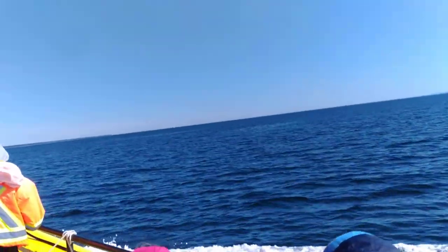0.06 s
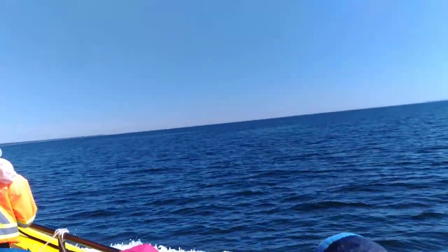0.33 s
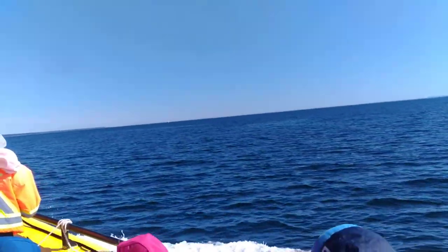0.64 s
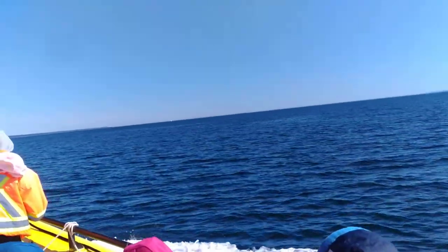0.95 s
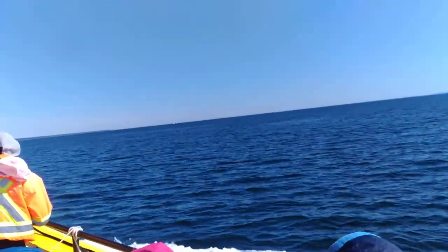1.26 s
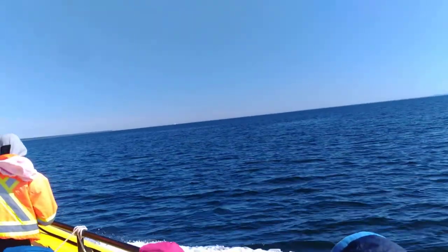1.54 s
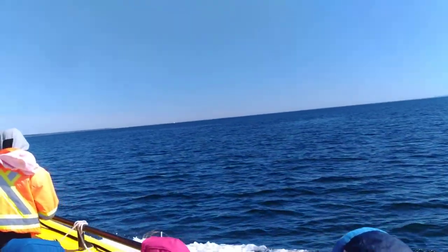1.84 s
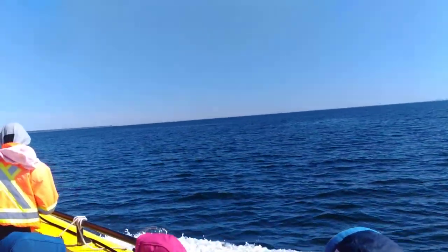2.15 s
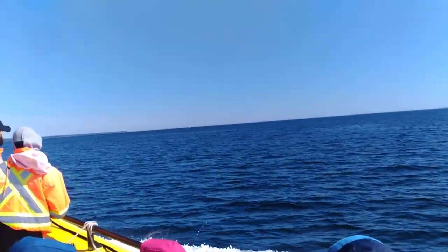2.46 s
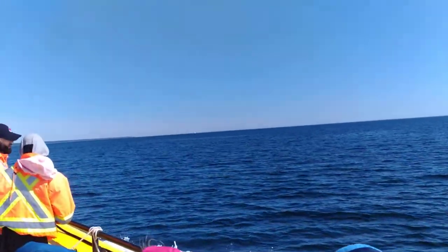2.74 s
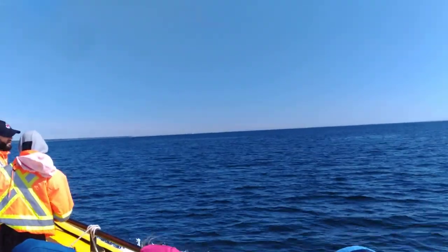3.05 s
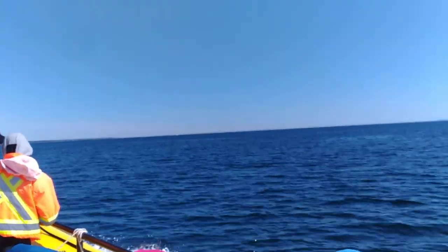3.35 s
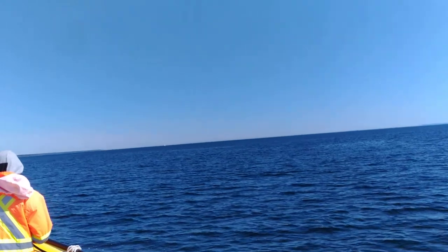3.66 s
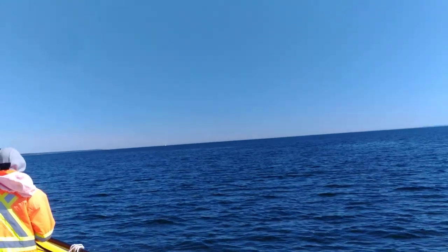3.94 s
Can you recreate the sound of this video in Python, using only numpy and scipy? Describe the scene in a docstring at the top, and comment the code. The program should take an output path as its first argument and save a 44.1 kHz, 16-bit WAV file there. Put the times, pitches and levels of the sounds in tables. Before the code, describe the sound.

Steady throbbing boat motor on open water, with gusts hitting the microphone and hissing spray.

```python
"""A motor boat's four-stroke engine drones at a steady cruising speed, heard from the deck.
Its orders beat into a throb over faint whines and clatter: loud at first, sinking back, swelling at the end.
Foam from the bow wash fizzes mostly on the left; spray and air hiss on the right.
Gusts throw eddies at the right microphone port, which flutters, rasps and thumps.
The ports colour the treble, and one sharp tick cuts in near the end."""
import sys
import numpy as np
from scipy import signal
from scipy.fft import rfft, irfft
from scipy.io import wavfile

SR = 44100
rng = np.random.default_rng(int(sys.argv[2]) if len(sys.argv) > 2 else 0)


def unload_audio(sound):
    """Save the sound as a 16-bit wav file, at the path given as the first command line argument."""
    columns = np.transpose(np.atleast_2d(sound))
    # keep every value between -1 and 1, then stretch to whole-number steps
    steps = np.round(np.clip(columns, -1, 1) * 32767)
    wavfile.write(sys.argv[1], SR, steps.astype(np.int16))


N = 176400
CYCLE_HZ = 14.83  # four-stroke cycles per second


def from_db(db):
    """Decibels to gain."""
    return 10 ** (np.asarray(db) / 20)


def rms_one(x):
    """Scale to an rms of one."""
    return x / np.sqrt(np.mean(x ** 2) + 1e-20)


def envelopes(rows):
    """Join breakpoints (seconds, then values) with straight lines: one envelope per value column."""
    seconds, *columns = np.transpose(rows)
    return np.array([np.interp(np.arange(N) / SR, seconds, column) for column in columns])


def db_at(curve, hz):
    """Read an EQ curve of (Hz, dB) points on a log-frequency axis."""
    points_hz, db = np.transpose(curve)
    return np.interp(np.log(np.maximum(hz, 1)), np.log(points_hz), db)


def equalise(x, curve):
    """Filter by an EQ curve, with no phase shift."""
    bins_hz = np.arange(N // 2 + 1) * SR / N
    return irfft(rfft(x) * from_db(db_at(curve, bins_hz)), N)


def noise(curve, texture=1):
    """White noise, modulated by a texture, then shaped by an EQ curve; rms one."""
    return rms_one(equalise(rng.standard_normal(N) * texture, curve))


def drift(rate_hz):
    """Smooth random motion at about this rate, with a spread of one."""
    hop, settle = 40, 2000  # samples per control step; steps for the filter to settle
    pole = np.exp(-2 * np.pi * hop * rate_hz / SR)
    white = rng.standard_normal(N // hop + settle + 2)
    slow = signal.lfilter([1], [1, -2 * pole, pole * pole], white)[settle:]
    return np.interp(np.arange(N) / hop, np.arange(len(slow)), rms_one(slow))


def waver(depth_db, rate_hz):
    """A randomly wavering gain of mean power one."""
    return rms_one(from_db(depth_db * np.clip(drift(rate_hz), -2, 2)))


def gust_strength():
    """Wind strength in dB: slow gusts plus buffets that rise fast and fall away more slowly."""
    # Gusts on the right port. Each row: time in seconds, strength in dB.
    gusts = [(0, -68), (0.2, -60), (0.24, -18), (0.36, -22), (0.6, -15.5), (0.98, -14), (1.32, -28.5),
             (1.38, -14.5), (1.92, -18.5), (2.02, -20.5), (2.2, -28), (2.26, -29), (2.61, -24),
             (2.8, -14.5), (3.13, -31), (3.33, -16), (3.4, -21.5), (3.99, -21.5)]
    # Single buffets slapping the port. Each row: start in seconds, peak strength in dB.
    buffets = [(0.219, -12.5), (0.473, -10), (0.716, -17), (0.89, -10.5), (1.002, -13.5), (1.124, -15),
               (1.357, -12), (1.588, -14.5), (1.816, -15), (2.017, -14.5), (2.095, -13.5), (2.167, -14.5),
               (2.514, -12), (2.653, -11), (2.973, -9), (3.038, -14), (3.284, -18.5), (3.454, -11.5),
               (3.639, -10.5)]
    rise_s = 0.0089
    power = from_db(envelopes(gusts)[0]) ** 2
    for start_s, peak_db in buffets:
        age = np.clip((np.arange(N) / SR - start_s) / rise_s, 0, 20)  # in rise times
        power = power + from_db(peak_db) ** 2 * age * np.exp(1 - age)
    return 10 * np.log10(power)


def eddies(per_second, decay_s):
    """Each eddy strikes at once and dies away; together they give an uneven pressure around one."""
    strikes = (rng.random(N) < per_second / SR) * rng.uniform(0, 1, N) ** 2
    pressure = signal.lfilter([1], [1, -np.exp(-1 / (decay_s * SR))], strikes + 1e-18)
    return pressure / pressure.mean() + .1


def wind():
    """Eddies hit the port in lumps over a low thumping; the small, rasping ones grow fastest in a gust."""
    # Tone of the large, fluttering eddies. Each row: frequency in Hz, gain in dB.
    flutter_eq = [(90, -35), (170, 2), (260, 0.5), (420, -5), (600, -10), (1000, -26), (4500, -66)]
    # Tone of the small, rasping eddies. Each row: frequency in Hz, gain in dB.
    rasp_eq = [(200, -19), (450, 3), (750, -3), (1100, -9), (1600, -18), (2300, -23), (5500, -67)]
    # Tone of the low thumping. Each row: frequency in Hz, gain in dB.
    thump_eq = [(15, -46), (45, -21), (90, 2), (140, -0.5), (200, -2), (300, -12), (600, -52)]
    # Envelope of the thumping. Each row: time in seconds, relative level in dB.
    thump_levels = [(0, -16), (0.18, -44), (0.23, -17.5), (1.3, -19), (1.36, -28), (2.14, -16), (2.33, -29),
                    (3.01, -17), (3.17, -33), (3.36, -15.5), (3.99, -18)]
    flutter_db, rasp_db, thump_db, left_db = 2.06, -10, -1.5, -21
    flutter_lumpiness, rasp_lumpiness, rasp_growth = 0.47, 0.84, 1.24
    gust_db = gust_strength()
    pressure = eddies(per_second=480, decay_s=0.0033)
    flutter = from_db(flutter_db + gust_db) * noise(flutter_eq, pressure ** flutter_lumpiness)
    steeper_gust_db = gust_db.mean() + rasp_growth * (gust_db - gust_db.mean())
    rasp = from_db(rasp_db + steeper_gust_db) * noise(rasp_eq, pressure ** rasp_lumpiness)
    thump = from_db(thump_db + envelopes(thump_levels)[0]) * noise(thump_eq)
    pan = np.array([[from_db(left_db)], [1]])
    return pan * (flutter + rasp + thump)


def spray():
    """Spray and air give a flickering hiss on the windward side, the right."""
    # Envelope of the hiss. Each row: time in seconds, relative level in dB.
    hiss_levels = [(0.0, -64), (0.16, -37), (0.51, -36.5), (0.87, -29), (1.04, -35), (1.41, -30.5),
                   (1.52, -37), (1.93, -32.5), (2.53, -32), (3.28, -29.5), (3.99, -34)]
    # Tone of the hiss. Each row: frequency in Hz, gain in dB.
    hiss_eq = [(1200, -12), (2200, 3.5), (4500, 1.5), (7000, 1), (9000, -1), (11000, 4), (16000, -7)]
    gain = from_db(envelopes(hiss_levels)[0] - 3)
    hiss = gain * noise(hiss_eq) * waver(depth_db=2.0, rate_hz=12.8)
    return np.array([np.zeros(N), hiss])


def bow_wash():
    """Bursting foam fizzes in surges, mostly along the left side, with one short splash."""
    # Surges of the wash. Each row: time in seconds, relative level in dB.
    surges = [(0.0, -30), (0.3, -30), (0.48, -32), (0.53, -44), (1.06, -48), (1.35, -37.5), (1.8, -44.5),
              (2.2, -48), (2.45, -35.5), (3.0, -45), (3.3, -37), (3.99, -42)]
    # Tone of the foam. Each row: frequency in Hz, gain in dB.
    foam_eq = [(1500, -17), (3000, 0.5), (4400, -2.5), (4850, -1), (5060, 3), (5300, -0.5), (6300, 2),
               (8000, -2.5), (16000, -36)]
    trim_db, right_db = -1.5, -10
    splash_s, splash_db, splash_width_s = 0.161, -23.5, 0.012
    splash = from_db(splash_db) * np.exp(-((np.arange(N) / SR - splash_s) / splash_width_s) ** 2)
    gain = from_db(trim_db) * np.hypot(from_db(envelopes(surges)[0]), splash)  # powers add
    foam = np.array([noise(foam_eq) * waver(depth_db=2.3, rate_hz=7.0) for side in range(2)])
    pan = np.array([[1], [from_db(right_db)]])
    return pan * gain * foam


def tick(start_s, level_db, decay_s):
    """A sharp tick: a sudden step that dies at once, stronger on the right."""
    age = np.arange(N) / SR - start_s
    step = -from_db(level_db) * (age >= 0) * np.exp(-np.abs(age) / decay_s)
    return step * np.array([[.8], [1]])


def whines(width_hz):
    """Faint engine whines, each a narrow band of noise around one pitch."""
    # The whines. Each row: pitch in Hz, relative level in dB.
    pitches = [(1198, -29.5), (1680, -34), (1921, -37.5)]
    sound = 0
    for hz, db in pitches:
        phase = 2 * np.pi * hz * np.arange(N) / SR
        band = drift(width_hz) * np.sin(phase) + drift(width_hz) * np.cos(phase)
        sound = sound + from_db(db) * band / 2
    return sound


def clatter(pulse_phase, depth):
    """Mechanical clatter and water along the hull: wide noise that pulses with the engine."""
    # Tone of the clatter. Each row: frequency in Hz, gain in dB.
    clatter_eq = [(30, -10), (200, 2.5), (550, 1.5), (800, -10), (2000, -17), (3000, -21), (6000, -33.5),
                  (10000, -24.5), (16000, -33)]
    pulsing = 1 + depth * np.sin(pulse_phase)
    return np.array([noise(clatter_eq), noise(clatter_eq)]) * pulsing


def drone(cycle_phase, firing_order):
    """Wavering engine orders, loosely in phase, beat into one throb per cycle; rms one."""
    # Strong low orders. Each row: multiple of the cycle rate, relative level in dB.
    low_orders = [(6, -7.5), (7, -25), (8, -11.5), (9, 1), (10, -20), (11, -7), (12, -0.5), (13, -17),
                  (14, -7.5), (15, -16), (16, -29), (17, -12), (18, -20.5), (19, -15)]
    # Weak upper orders as the hull passes them on. Each row: frequency in Hz, relative level in dB.
    hull_eq = [(295, -23), (345, -32.5), (440, -25.5), (590, -27.5), (650, -38.5), (900, -36)]
    swell_hz, swell_top_s, swell_db = 0.468, 0.022, 3.5  # the firing note swells slowly
    scatter_radians = 0.9
    upper_orders = [(order, db_at(hull_eq, order * CYCLE_HZ)) for order in range(20, 60)]
    swell = from_db(swell_db * np.cos(2 * np.pi * swell_hz * (np.arange(N) / SR - swell_top_s)))
    sound = 0
    for order, db in low_orders + upper_orders:
        gain = from_db(db) * waver(depth_db=1.5, rate_hz=0.82)
        if order == firing_order:
            gain = gain * swell
        sound = sound + gain * np.sin(order * cycle_phase + rng.normal(0, scatter_radians))
    return rms_one(sound)


def engine():
    """The engine holds its speed; its drone rises and falls, and whines and clatter partly follow."""
    # Drone envelope. Each row: time in seconds, relative level in dB on the left, then the right.
    drone_levels = [(0.0, -10, -22.5), (0.28, -9.5, -15), (0.48, -13, -10), (0.59, -23, -25),
                    (0.7, -22.5, -14.5), (1.01, -20, -20), (1.31, -17, -17), (1.75, -22, -11),
                    (2.46, -16.5, -18), (2.77, -13.5, -11), (2.98, -23, -18.5), (3.33, -11.5, -16.5),
                    (3.37, -26, -12.5), (3.47, -13, -18.5), (3.56, -8.5, -9.5), (3.99, -10, -11.5)]
    speed_wander, firing_order, right_lag_s = 0.0019, 6, 0.00029
    drone_db, clatter_db, follow_share = -0.97, -31, 0.65
    t = np.arange(N) / SR
    speed_hz = CYCLE_HZ * (1 + speed_wander * drift(rate_hz=1.82))
    cycle_phase = 2 * np.pi * np.cumsum(speed_hz) / SR
    level_db = envelopes(drone_levels)
    left = drone(cycle_phase, firing_order)
    right = np.interp(t - right_lag_s, t, left)
    whine = from_db(level_db.mean()) * whines(width_hz=12.7)
    rattle = from_db(clatter_db) * clatter(firing_order / 2 * cycle_phase, depth=0.17)
    left_swing_db = level_db[0] - level_db[0].mean()
    machinery = from_db(follow_share * left_swing_db) * (rattle + whine)
    return from_db(drone_db + level_db) * np.array([left, right]) + machinery


def scene():
    """Engine, water and wind at the two microphone ports."""
    return engine() + spray() + bow_wash() + wind()


def record(dry):
    """The ports colour the treble, a tick cuts in, the highest peaks are rounded, the top is cut."""
    # Peaks and notches of the microphone ports. Each row: frequency in Hz, gain in dB.
    port_eq = [(2800, 1), (3200, -7), (3750, -6.5), (4150, 7), (4700, 6), (5040, 12), (5400, 3.5),
               (7000, -0.5), (7950, -9.5), (8600, 2), (10800, 3.5), (11800, -3.5), (12700, -30),
               (13400, -4.5), (15500, -14)]
    ceiling, cutoff_hz = .97, 15750
    mix = equalise(dry, port_eq) + tick(start_s=3.586, level_db=-3, decay_s=.0007)
    rounded = mix / (1 + (mix / ceiling) ** 6) ** (1 / 6)
    low_pass = signal.ellip(10, .1, 70, cutoff_hz, fs=SR, output="sos")
    return signal.sosfiltfilt(low_pass, rounded)


dry = scene()
out = record(dry)
unload_audio(out)
```